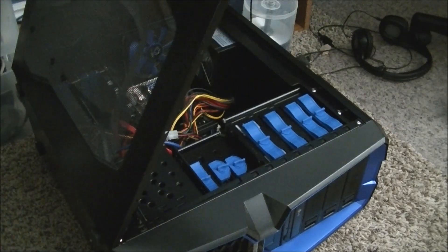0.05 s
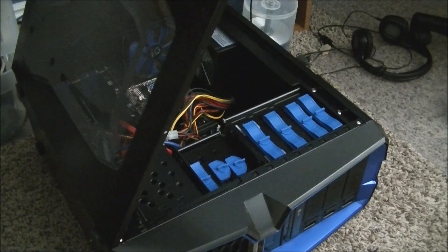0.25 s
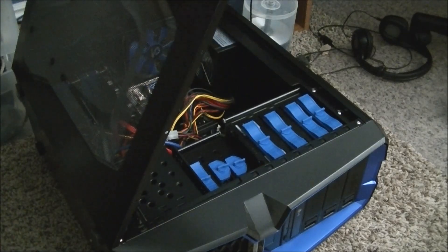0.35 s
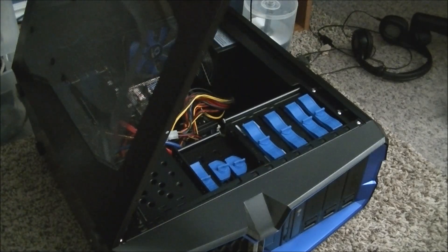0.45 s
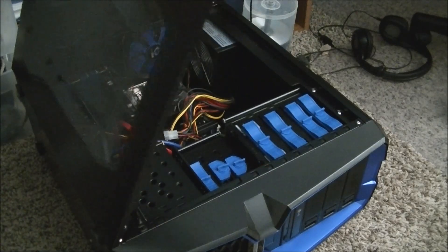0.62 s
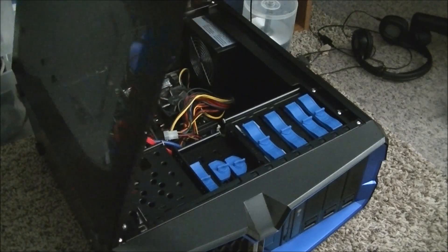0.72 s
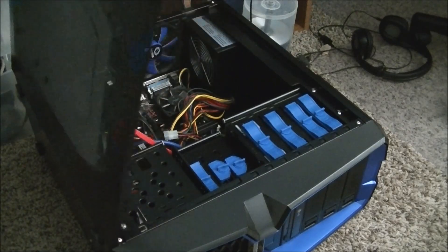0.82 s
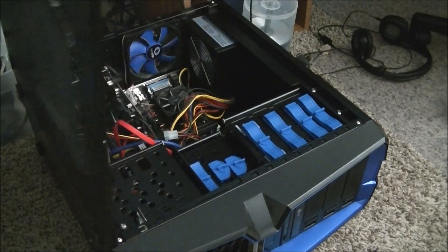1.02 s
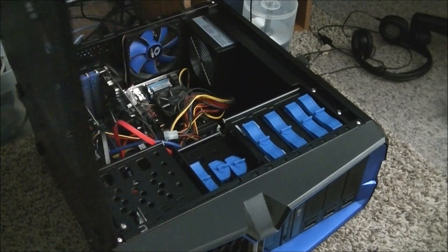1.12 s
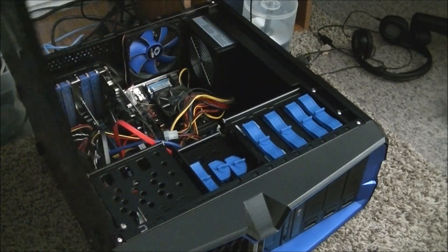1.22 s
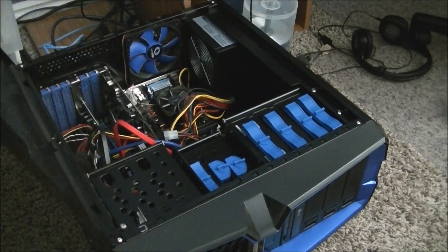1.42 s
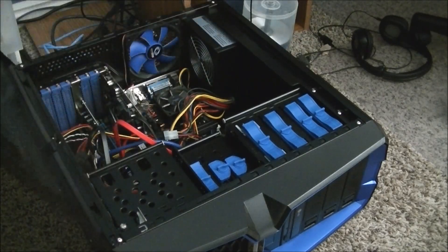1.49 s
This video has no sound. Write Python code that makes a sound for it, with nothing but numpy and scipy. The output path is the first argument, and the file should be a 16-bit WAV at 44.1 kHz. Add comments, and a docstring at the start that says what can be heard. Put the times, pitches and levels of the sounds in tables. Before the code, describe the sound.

Close up in a small damped room, a sheet metal case panel clicks, slides and clatters in a hard hollow bang within the first half second, then gives only light ticks and soft brushing over quiet hiss.

```python
"""The steel side panel of a computer case on carpet is worked loose, slid along its rails and lifted away.
First it pops free with a knock and scrapes, each rubbing sound made of many tiny random slips.
Then it bangs on the frame, chatters, flexes and grinds; a knock is a noise burst plus a short ring.
Last come light ticks, soft brushing and a few late, soft knocks as it is lifted.
Throughout, sheet and hollow case ring in a small, damped room with a quiet hiss."""
import sys
import numpy as np
from scipy import signal
from scipy.fft import rfft, irfft
from scipy.io import wavfile
from scipy.ndimage import uniform_filter1d

SR = 44100
rng = np.random.default_rng(int(sys.argv[2]) if len(sys.argv) > 2 else 0)


def transcribe(u):
    """Save the signal u as a 16-bit wav file named by the first command-line argument.

    u: samples, shape (n,) or (channels, n), limited to [-1, 1]; the rate is SR.
    q: integer samples, one column per channel.
    """
    v = np.clip(np.atleast_2d(u).T, -1, 1)
    q = np.round(v * 32767).astype(np.int16)
    wavfile.write(sys.argv[1], SR, q)


N = 68355

# Steady room air and hiss: colour (frequency [Hz], level [dB])
ROOM_TONE_COLOUR = [(25, -20), (60, -5.5), (130, -1), (300, -3.5), (1000, -6), (2500, -7.5), (6000, -21),
                    (10000, -21), (15000, -26)]
# Room tone, side signal against middle signal (frequency [Hz], level [dB])
ROOM_TONE_WIDTH = [(30, -8), (150, -5.5), (1000, -7.5), (6000, -6), (9000, -19), (13000, -27)]
# Side signal against middle signal for the panel's sounds (frequency [Hz], level [dB])
PANEL_WIDTH = [(50, -35), (200, -23), (500, -22.5), (1500, -19.5), (7000, -16.5), (12000, -36)]
# Left channel minus right channel (frequency [Hz], difference [dB])
LEFT_RIGHT_BALANCE = [(100, -1.9), (400, 0.1), (2000, 0.1), (8000, 1), (12000, -0.5)]
# How long the room's tail takes to fall by 60 dB (frequency [Hz], time [s])
ROOM_DECAY = [(60, 0.37), (250, 0.49), (1000, 0.47), (4000, 0.4), (14000, 0.32)]
# Long ringing modes of sheet and case (frequency [Hz], level before a tilt [dB], time to fall by 60 dB [s])
CASE_MODES = [(230.7, -7.5, 0.14), (235.7, -4.5, 0.2), (429, -21, 0.45), (505, -14, 0.13),
              (760, -12.5, 0.082), (1040, -8, 0.38), (1374, -5, 0.089), (1719, -6.5, 0.12),
              (2060, -8.5, 0.3), (2320, -16, 0.65), (2700, -14, 0.24), (3080, -16, 0.11),
              (3900, -12.5, 0.46), (4760, -10.5, .25)]
# Dense short modes heard in each contact (frequency [Hz], time to fall by 60 dB [s])
CONTACT_DECAY = [(60, 0.22), (250, 0.23), (1000, 0.1), (4000, 0.16), (14000, 0.057)]
# Light brushing while the panel is lifted (time [s], relative level [dB])
BRUSH_LEVEL = [(.62, -58), (.9, -56.5), (1.15, -59), (1.24, -54), (1.31, -56.5), (1.35, -51), (1.445, -58),
               (1.475, -45), (1.51, -47), (1.55, -58.5)]
# Colour of the brushing (frequency [Hz], level [dB])
BRUSH_TONE = [(100, -11.5), (600, -8.5), (1200, -5.5), (2300, -1), (4000, -4), (6500, -6), (10000, -13.5),
              (15000, -21)]
# Smooth sliding, first along the rails, later past the rim (time [s], relative level [dB])
SLIDE_LEVEL = [(0, -59), (.19, -59.5), (.225, -47.5), (.27, -40), (.34, -36.5), (.38, -38), (.43, -37),
               (.48, -40.5), (.55, -49.5), (.6, -60), (.625, -50.5), (.68, -65), (1.28, -74), (1.4, -53.5),
               (1.5, -53), (1.55, -54)]
# Colour of the sliding (frequency [Hz], level [dB])
SLIDE_TONE = [(100, -8), (500, 5.5), (1500, -2), (4000, 1.5), (7000, 0), (11000, -6.5), (15000, -12.5)]
# The sheet flexes as it comes free (time [s], relative level [dB])
FLEX_LEVEL = [(.33, -48), (.38, -39), (.42, -39), (.45, -29), (.5, -31.5), (.54, -38), (.585, -34),
              (.62, -45), (.68, -71)]
# Colour of the flexing (frequency [Hz], level [dB])
FLEX_TONE = [(30, -22), (65, -13), (100, -4), (170, -0.5), (230, 1), (330, -6.5), (1000, -46), (8000, -64)]
# The edge grinds along the frame after the bang and slips off (time [s], relative level [dB])
GRIND_LEVEL = [(.46, -45), (.485, -34), (.515, -30.5), (.548, -31.5), (.566, -40), (.578, -51)]
# Colour of the grinding (frequency [Hz], level [dB])
GRIND_TONE = [(200, -15), (900, -5), (1700, 6.5), (2800, 1), (4500, -6), (6300, -4), (8000, -16),
              (15000, -29)]
# Stick-slip chatter of the sheet on the frame (time [s], relative level [dB])
CHATTER_LEVEL = [(0, -61), (.07, -56), (.165, -56), (.195, -43.5), (.26, -43), (.33, -41), (.375, -32),
                 (.4, -36.5), (.49, -27), (.55, -28), (.58, -40), (.66, -48.5), (.8, -53.5), (.95, -60.5)]
# Colour of the chatter (frequency [Hz], level [dB])
CHATTER_TONE = [(30, -35), (70, -5.5), (130, 0), (250, 7.5), (600, 5), (1300, -0.5), (2600, -10.5),
                (5500, -14.5), (9000, -40), (15000, -39)]
# Light ticks of the panel's edge
# (time [s], relative level [dB], treble [dB], contact length [s], resonance of the struck spot [Hz])
EDGE_TICKS = [(.653, -7.5, -1.5, 0.0048, 2760), (.841, -6.5, -3, 0.0027, 2800),
              (0.847, -6, -5, 0.0033, 2150), (0.966, -7, -1, 0.0059, 1700),
              (0.984, -6.5, -4.5, 0.014, 2800), (1.052, -13.5, -8, 0.00086, 1410),
              (1.085, -12, -6, .003, 2400), (1.091, -13.5, -5, 0.0031, 2300),
              (1.461, -10, 8.5, 0.00086, 2240), (1.486, -25, 3, .004, 3000), (1.5, -10, 6, 0.0053, 4550),
              (1.525, -8.5, -3, 0.0044, 1330)]
# Colour of the ticks (frequency [Hz], level [dB])
TICK_TONE = [(100, -28), (600, -2), (1200, -6.5), (2300, -0.5), (3100, -5.5), (5000, -9.5), (9000, -22),
             (15000, -31)]
# Panel knocking on the frame (time [s], relative level [dB], bass [dB], body [dB], treble [dB],
# contact length [s], resonance of the struck spot [Hz])
FRAME_KNOCKS = [(0.045, -10.5, 5.5, -2, -13, 0.00095, 790), (0.061, -12, 6, 1.5, 1, 0.0038, 4600),
                (0.116, -9.5, -5, -8, 7, 0.00084, 3860), (0.13, -19, 15, 11.5, -5, .002, 4800),
                (.15, -25, 7.5, 7, -8, 0.0085, 280), (0.2042, 13.5, 0, 1, -1.5, 0.0018, 1630),
                (0.2196, 4, 6.5, 9, -6, 0.0011, 306), (0.2333, -2.5, 0, 12, -2, 0.001, 590),
                (.369, 1, -1, 0.5, -4, 0.0012, 740), (.385, 2, 2, 5.5, -7, 0.0034, 300),
                (0.4024, 10.5, -3.5, -8.5, 10, 0.001, 6200), (0.4042, 16, -1.5, 2, 2, 0.0016, 1280),
                (0.4315, 11, 4, 3.5, -8, 0.0016, 695), (0.4396, 6.5, 11.5, 8, -0.5, 0.0024, 504),
                (0.452, 6.5, 10.5, 10, 0, .002, 248), (.460, 11.5, -0.5, -5, 8.5, 0.0013, 2950),
                (0.464, 23.5, -6.5, -5, 1, 0.0012, 1135), (0.4779, 12.5, -12, -2.5, 0, 0.0057, 2880),
                (.499, 13.5, 2.5, 0, -20, 0.0088, 1460), (0.534, 9.5, 4.5, -9, -7, 0.0054, 2630),
                (.546, 5.5, 8.5, -5, -2, 0.0022, 800), (0.565, -3, 8.5, 5.5, 6.5, 0.0023, 190),
                (0.713, -4, -5, 4, -11, 0.0024, 850), (0.753, -13, -2, 3, -14, 0.0026, 600),
                (1.532, -21.5, 11, 2, -10, 0.0034, 258)]
# Colour of the knocks (frequency [Hz], level [dB])
KNOCK_TONE = [(25, -42), (65, -2.5), (130, 0), (250, 4), (600, 2), (1200, -0.5), (2100, -7.5), (3200, -6.5),
              (6000, -14.5), (9000, -24.5), (15000, -40)]

ROOM_TONE_DB = -55.5  # middle signal, average level below full scale
ROOM_DB, ROOM_BUILD_S = -13, 0.0058  # energy of the tail against the direct sound, and its build-up time
CRACK_DB, RING_DB = -3.5, -4.5  # mix of crack and ring inside one contact
HARD_DB, CRACK_GROWTH = 18.5, 0.84  # blows above this level gain crack [dB per dB]
CONTACT_RISE_S = 0.0003
SPOT_DB, SPOT_OCTAVES = 5.5, 0.2  # height of the struck spot's resonance, distance to half that many dB
RUB_PER_S, GRIND_PER_S, CHATTER_PER_S = 7000, 2500, 700  # average number of slips per second
RUB_SCATTER_DB, CHATTER_SCATTER_DB = 0.5, 3  # unevenness of the slips
TOP_HZ = 16100


def undb(db):
    """Turn decibels into a plain factor."""
    return 10 ** (np.asarray(db) / 20)


def unit(x):
    """Scale to unit energy."""
    return x / np.sqrt(np.sum(x ** 2))


def at_hz(table, hz):
    """Read a table between its rows, with frequency spaced by octaves as the ear hears it."""
    table_hz, values = np.array(table, float).T
    return np.interp(np.log(np.maximum(hz, 1)), np.log(table_hz), values)


def convolve(x, response):
    """Let every sample of x set off the response, keeping the length of x."""
    return signal.fftconvolve(x, response)[:len(x)]


def colour(x, table, size=4096):
    """Filter with a (Hz, dB) response that never sounds ahead of its input."""
    hz = np.arange(size // 2 + 1) * SR / size
    cepstrum = irfft(np.log(undb(at_hz(table, hz))))
    # Folding the second half onto the first puts the response as early as possible
    cepstrum[1:size // 2] *= 2
    cepstrum[size // 2 + 1:] = 0
    return convolve(x, irfft(np.exp(rfft(cepstrum))))


def flatten(x, width_hz):
    """Even out the broad spectrum of a burst, keeping its fine peaks; unit energy."""
    spectrum = rfft(x, 2 * len(x))
    width_bins = max(int(width_hz * 2 * len(x) / SR), 1)
    power = uniform_filter1d(abs(spectrum) ** 2, width_bins)
    return unit(irfft(spectrum / np.sqrt(np.abs(power) + 1e-18))[:len(x)])


def ring(decay_table, size):
    """Countless overlapping modes: noise that dies away band by band."""
    t = np.arange(size) / SR
    f = np.arange(size // 2 + 1) * SR / size
    hz, t60 = np.array(decay_table).T
    t60 = t60[:, None]
    band = np.arange(len(hz))
    # Each frequency is shared between its two nearest bands
    shares = np.maximum(1 - abs(at_hz(np.c_[hz, band], f) - band[:, None]), 0)
    bands = irfft(rfft(rng.standard_normal(size)) * shares, size)
    fade = np.exp(-np.log(1000) * t / t60)
    return unit(np.sum(bands * fade / np.sqrt(t60), axis=0))


def steady_noise(table):
    """Coloured noise with an average (rms) level of one."""
    return unit(colour(rng.standard_normal(N), table)) * np.sqrt(N)


def room_tone():
    """Steady room air and hiss, a little different at each capsule."""
    mid = steady_noise(ROOM_TONE_COLOUR) * undb(ROOM_TONE_DB)
    side = colour(steady_noise(ROOM_TONE_COLOUR) * undb(ROOM_TONE_DB), ROOM_TONE_WIDTH)
    return np.array([mid + side, mid - side])


def room(x):
    """A small carpeted room: many reflections blend into a short tail."""
    size = 32768
    build_up = 1 - np.exp(-(np.arange(size) / SR / ROOM_BUILD_S) ** 2)
    tail = unit(ring(ROOM_DECAY, size) * build_up)
    return x + undb(ROOM_DB) * convolve(x, tail)


def microphones(x):
    """Two close capsules: nearly the same sound, slightly different reflections."""
    reflections = flatten(ring([(100, .2), (10000, .12)], size=8192), 120)
    side = colour(convolve(x, reflections), PANEL_WIDTH)
    hz = np.arange(N + 1) * SR / (2 * N)
    lean = undb(at_hz(LEFT_RIGHT_BALANCE, hz) / 2)  # half the difference goes to each channel
    left = irfft(rfft(x + side, 2 * N) * lean)[:N]
    right = irfft(rfft(x - side, 2 * N) / lean)[:N]
    return np.array([left, right])


def case(x):
    """Every contact also sets the long modes of the steel ringing, each a fading tone."""
    t = np.arange(SR // 2) / SR
    modes = 0
    for hz, db, t60 in CASE_MODES:
        tone = unit(np.cos(2 * np.pi * hz * t) * np.exp(-np.log(1000) * t / t60))
        modes = modes + undb(db) * np.sqrt(hz / 1000) * tone  # higher modes are tilted up
    return x + undb(-18) / 2 * convolve(x, modes)


def friction(level_curve, table, per_s, scatter_db):
    """Tiny slips of uneven size at random moments, following a level curve."""
    happens = rng.random(N) < per_s / SR
    direction = rng.choice([-1, 1], N)
    size = undb(scatter_db * np.clip(rng.standard_normal(N), -2, 2))
    rub = unit(colour(happens * direction * size, table)) * np.sqrt(N)
    s, db = np.array(level_curve).T
    return rub * undb(np.interp(np.arange(N) / SR, s, db, left=-120, right=-120))


def brushing():
    """Many fine slips make the soft brushing of the lifted panel."""
    return friction(BRUSH_LEVEL, BRUSH_TONE, RUB_PER_S, RUB_SCATTER_DB)


def sliding():
    """Many fine slips blend into the smooth sliding of the sheet."""
    return friction(SLIDE_LEVEL, SLIDE_TONE, RUB_PER_S, RUB_SCATTER_DB)


def flexing():
    """Sparse, deep-toned pushes as the sheet bends."""
    return friction(FLEX_LEVEL, FLEX_TONE, CHATTER_PER_S, RUB_SCATTER_DB)


def grinding():
    """Fairly dense slips of the edge along the frame."""
    return friction(GRIND_LEVEL, GRIND_TONE, GRIND_PER_S, RUB_SCATTER_DB)


def chattering():
    """Sparse, uneven slips as the sheet sticks and lets go on the frame."""
    return friction(CHATTER_LEVEL, CHATTER_TONE, CHATTER_PER_S, CHATTER_SCATTER_DB)


def contact(start, db, bass_db, body_db, treble_db, length, spot_hz, size=4096):
    """One rough metal contact: a crack and the short ring of the spot that is struck."""
    t = np.arange(size) / SR
    push = flatten(rng.standard_normal(size) * np.exp(-np.minimum(t / length, 20)), 1500)
    crack = undb(CRACK_DB + CRACK_GROWTH * max(db - HARD_DB, 0)) * push
    short_ring = undb(RING_DB) * convolve(push, ring(CONTACT_DECAY, size))
    rise = np.minimum(t / CONTACT_RISE_S, 1)
    hit = unit(flatten(crack + short_ring, 400) * rise)
    hz = np.geomspace(50, 16000, 100)
    shelves = at_hz([(220, bass_db), (400, body_db), (650, body_db),
                     (1100, 0), (1700, 0), (3800, treble_db)], hz)
    spot = SPOT_DB / (1 + (np.log2(hz / spot_hz) / SPOT_OCTAVES) ** 2)
    hit = undb(db) * colour(hit, np.c_[hz, shelves + spot])
    return np.pad(hit, (int(start * SR), N))[:N]


def ticking():
    """Light contacts of the panel's edge, with no change to bass or body."""
    ticks = sum(contact(s, db, 0, 0, *rest) for s, db, *rest in EDGE_TICKS)
    return colour(ticks, TICK_TONE)


def knocking():
    """Contacts of the panel on the frame, from the first pop through the bangs to a few late, soft knocks."""
    return colour(sum(contact(*row) for row in FRAME_KNOCKS), KNOCK_TONE)


def scene():
    """Knocks, ticks and friction sound through the case into the room."""
    rubbing = brushing() + sliding() + flexing() + grinding() + chattering()
    panel = rubbing + ticking() + knocking()
    return room_tone() + microphones(room(case(panel)))


def record(dry):
    """The recorder rounds off loud peaks and cuts the highest treble."""
    rounded = dry / (1 + (dry / .9) ** 6) ** (1 / 6)
    low_pass = signal.ellip(10, .1, 80, TOP_HZ, fs=SR, output="sos")
    return signal.sosfilt(low_pass, rounded)


dry = scene()
out = record(dry)
transcribe(out)
```